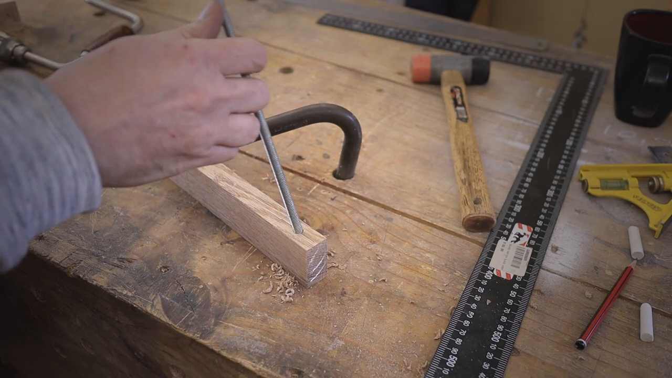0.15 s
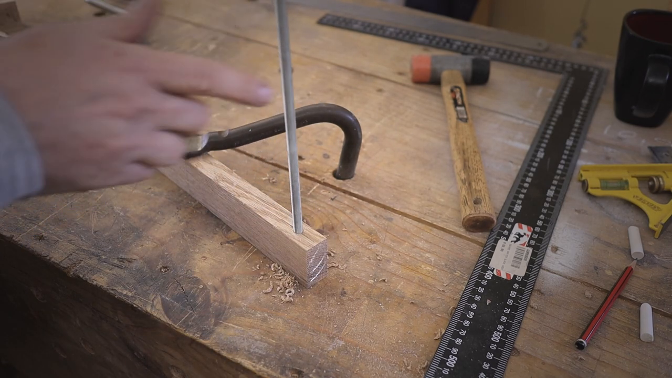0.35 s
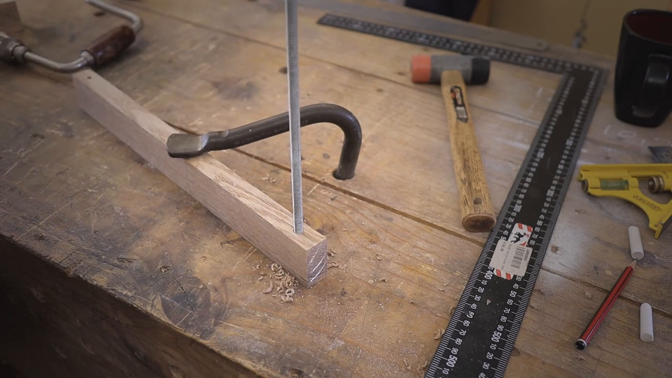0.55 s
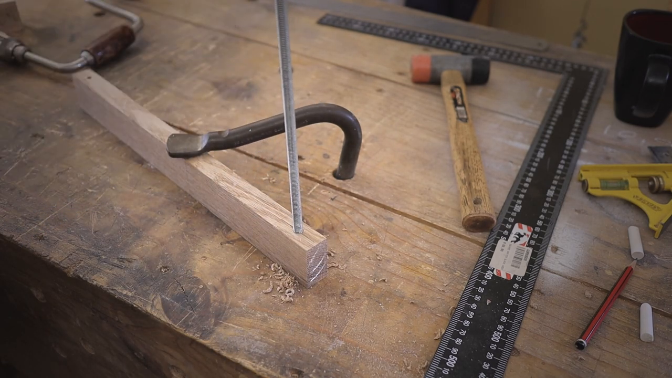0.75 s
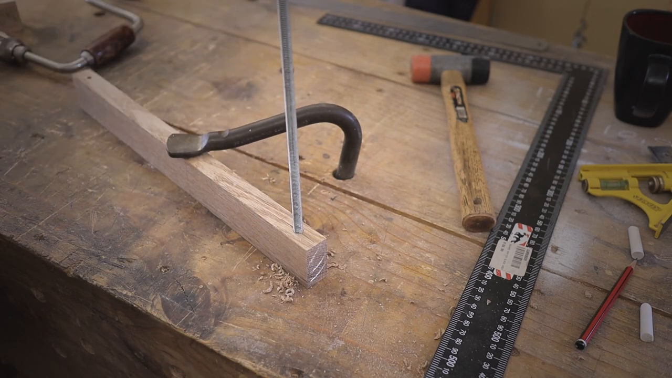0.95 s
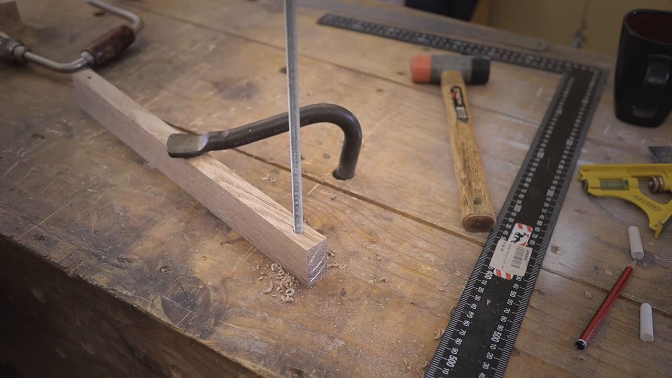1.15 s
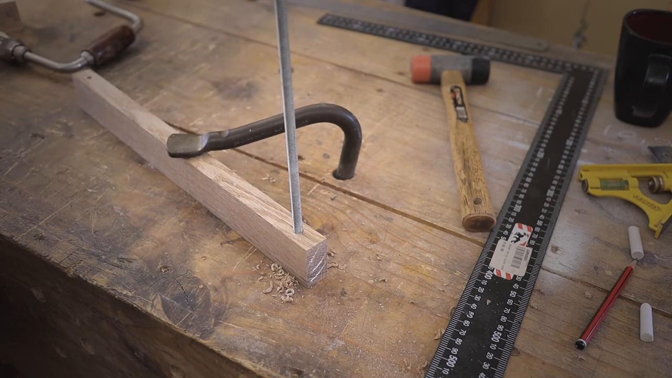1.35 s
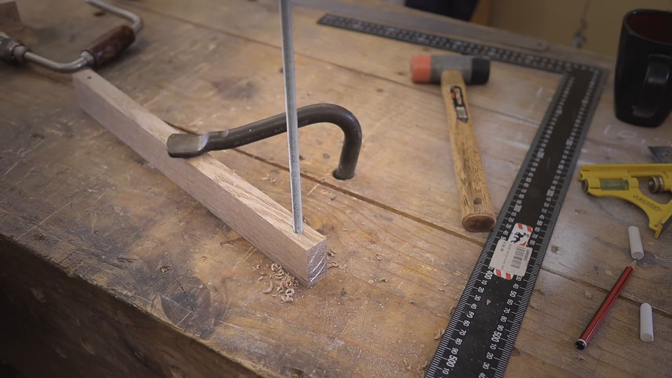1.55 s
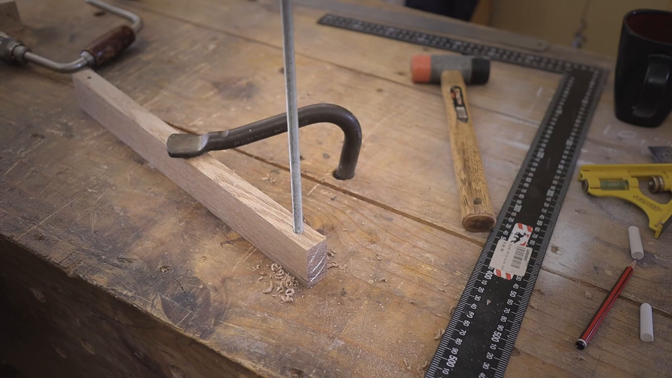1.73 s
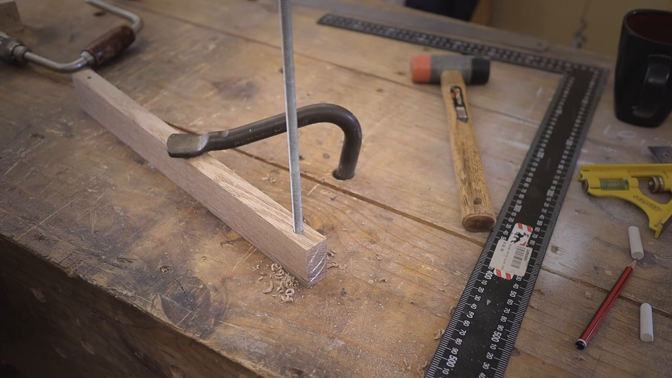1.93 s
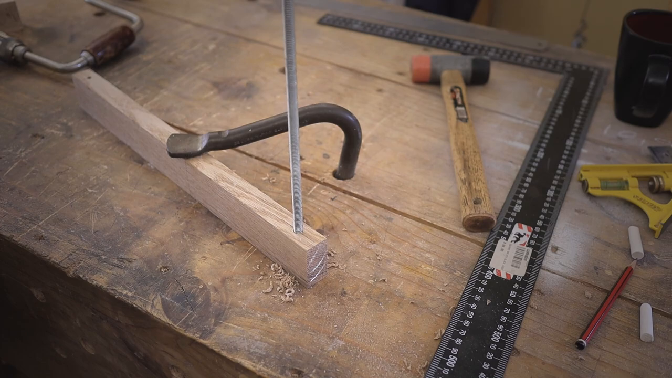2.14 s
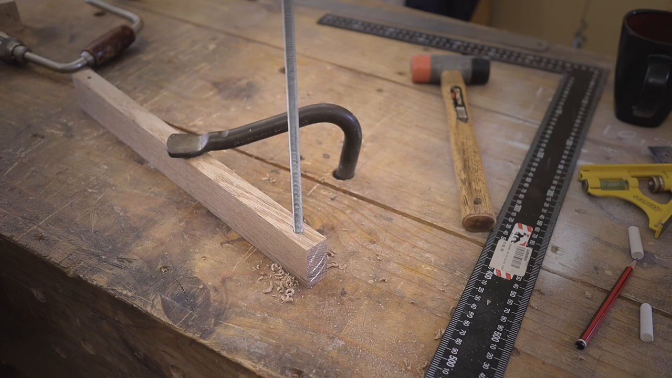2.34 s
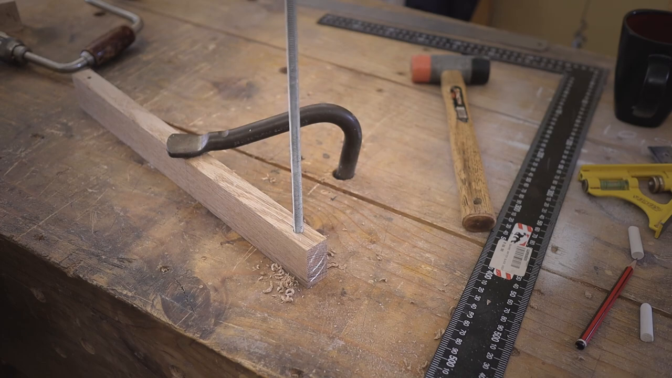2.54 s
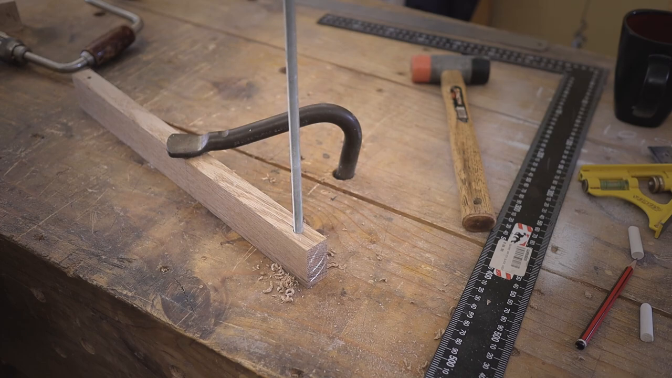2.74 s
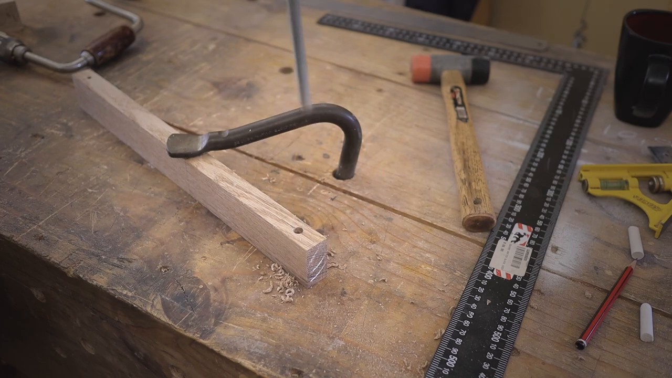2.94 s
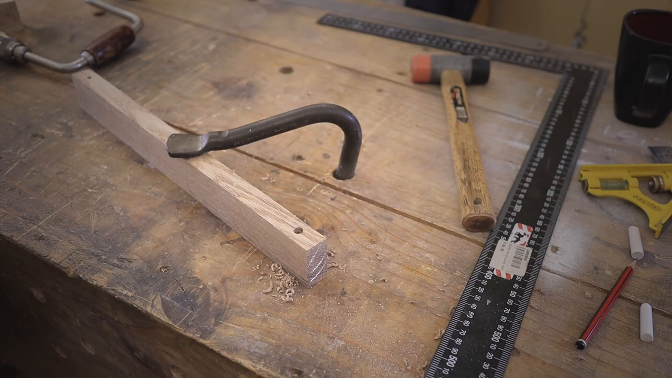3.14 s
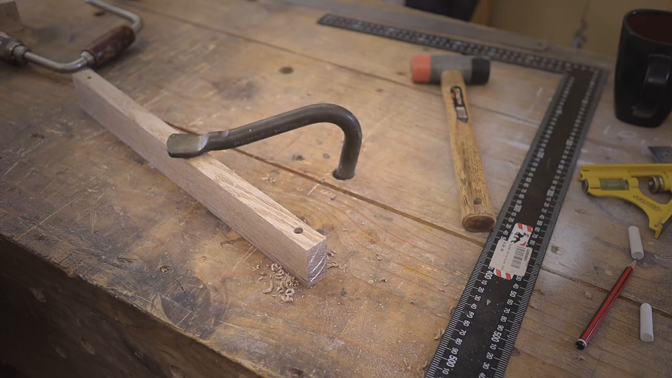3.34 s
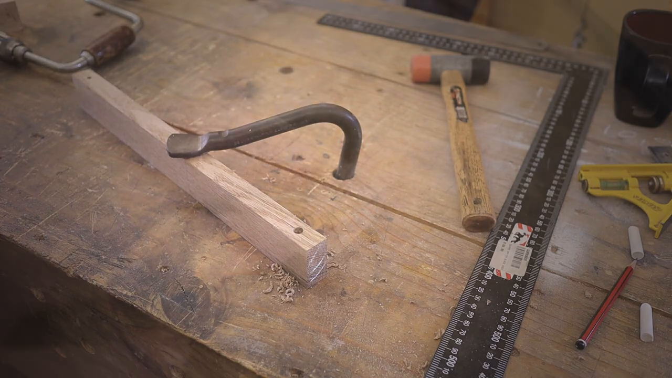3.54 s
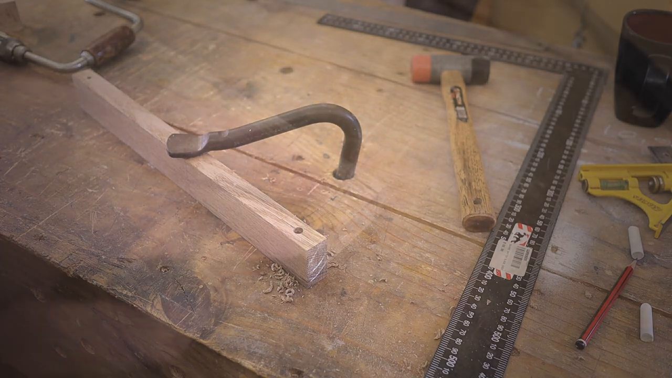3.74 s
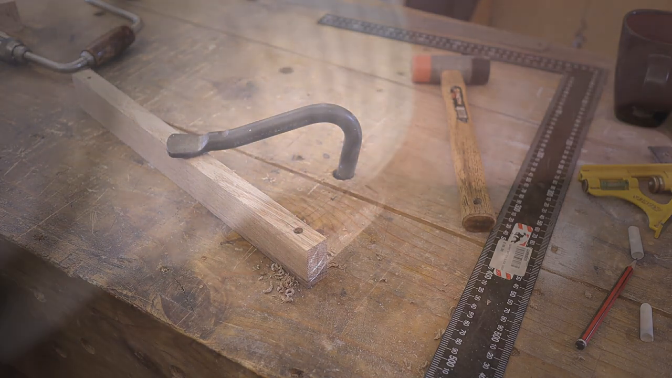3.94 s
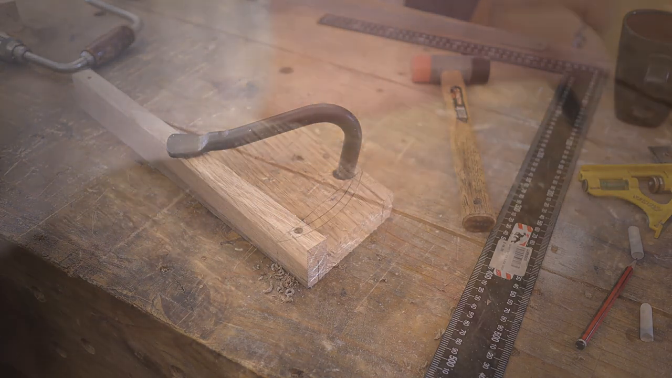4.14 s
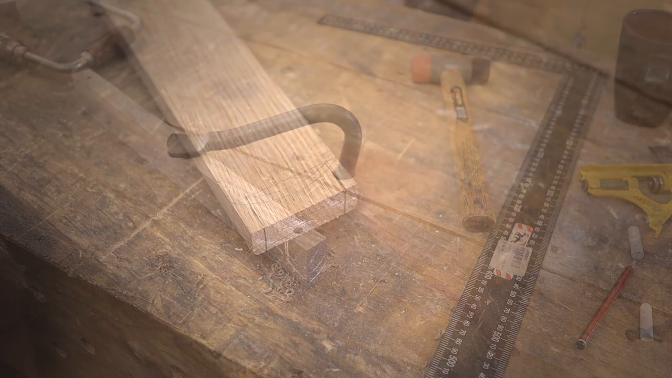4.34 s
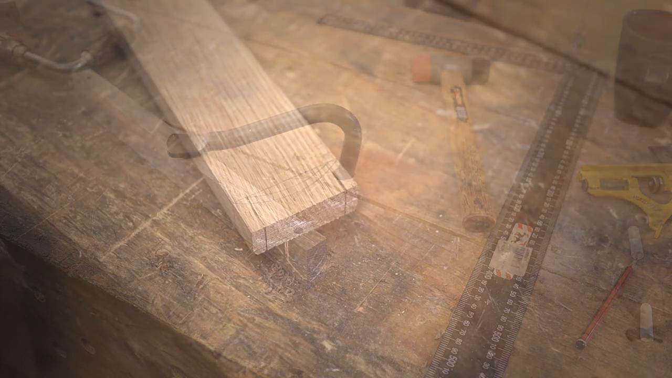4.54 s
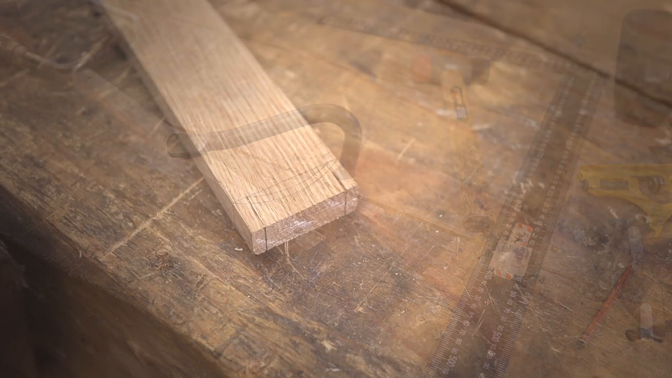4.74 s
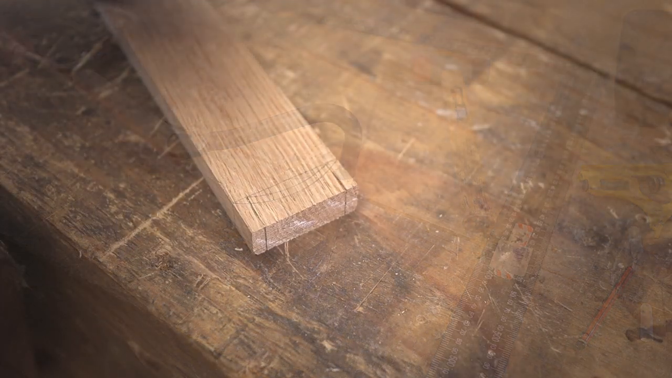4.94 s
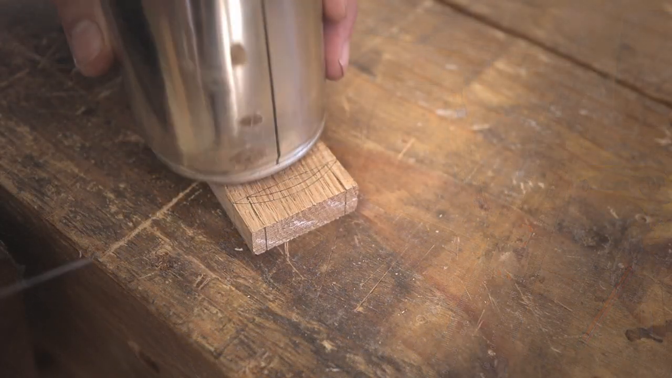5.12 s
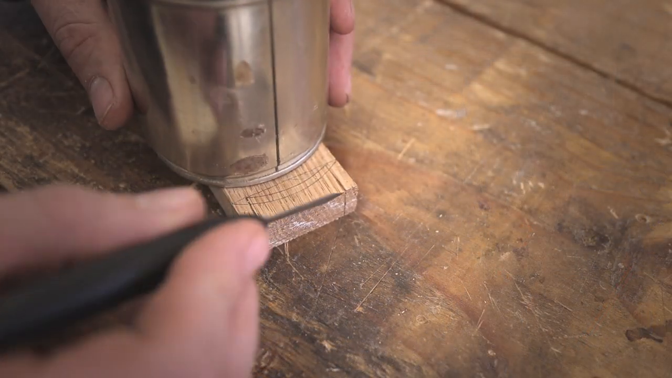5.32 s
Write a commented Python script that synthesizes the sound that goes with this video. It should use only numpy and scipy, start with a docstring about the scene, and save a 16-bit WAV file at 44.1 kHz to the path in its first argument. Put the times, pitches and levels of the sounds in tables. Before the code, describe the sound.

A small, quiet workshop with low, soft air noise, heard close up. A faint wooden tap opens, with a barely audible brush of cloth near 0.3 s. From about 0.39 s a steel rod chatters rapidly in a hole in a wooden batten, about eight contacts in under a tenth of a second. Light knocks at 0.7 s lead to a hard, bright clack at 0.79 s with an immediate hollow thud on the bench and a short room echo. Faint scrapes and ticks follow at 1.05, 1.6 and 2.24 s, with a small click at 2.43 s and a tiny rustle near 2 s. At 2.8 s the rod is pulled out: a scrape and quickening rattle peak around 2.9 s, with small trailing knocks. Soft sleeve rustles run from 3.3 to 4.1 s. At 4.26 s the background abruptly becomes a brighter, wider steady hiss, continuing alone to the end.

```python
"""In a small workshop, a steel rod drops into a hole in a wooden batten, which rocks and thuds on a bench.
The rod shifts and ticks in the hole, then is pulled out with a rattle; a sleeve brushes past.
Blows ring decaying sines for wood and steel, with fading noise for the wood's dense tones and the echo.
Rubbing, ticks and cloth are shaped noise. Quiet air noise gives way to a brighter hiss near the end."""
import sys
import numpy as np
from scipy import signal
from scipy.fft import rfft, irfft
from scipy.io import wavfile

SR = 44100
rng = np.random.default_rng(int(sys.argv[2]) if len(sys.argv) > 2 else 0)


def waveform_to_disk(signal):
    """Save audio, clipped to [-1, 1], as 16-bit WAV at the path in sys.argv[1]."""
    frames = np.transpose(np.atleast_2d(signal))
    scaled = np.clip(frames, -1, 1) * 32767
    samples = np.round(scaled).astype(np.int16)
    wavfile.write(sys.argv[1], SR, samples)


N = 237178  # length of the scene in samples
RING_SIZE = 32768  # length of one short sound in samples
T = np.arange(RING_SIZE) / SR
HZ = np.fft.rfftfreq(RING_SIZE, 1 / SR)

# Quiet workshop air: (frequency [Hz], density [dB per Hz])
AIR_SPECTRUM = [(15, -35), (25, -19), (66, -0.5), (107, -1.5), (156, 0), (297, -5), (331, -4), (582, -7.5),
                (895, -8), (1270, -11), (2060, -15), (2490, -19.5), (3930, -19), (6730, -29),
                (15500, -31.5)]
# Brighter hiss near the end: (frequency [Hz], density [dB per Hz])
HISS_SPECTRUM = [(29, -50), (50, 1), (85, -2), (211, -1), (358, -4), (413, -3.5), (718, -5.5), (870, -6.5),
                 (1700, -10), (15500, -16.5)]
# How alike the hiss is on left and right: (frequency [Hz], likeness [0 to 1])
HISS_LIKENESS = [(1000, 0.93), (2800, 0.79), (5000, 0.72), (9000, 0.64), (12000, .55), (14000, .98)]
AIR_DB, HISS_DB, HISS_START_S = -52.5, -49, 4.259

# Colour of the workshop echo: (frequency [Hz], level [dB])
ROOM_COLOUR = [(100, 12), (700, 0.5), (2000, 0), (4500, 0.5), (8000, -1.5), (15000, 8)]
# Time for the echo to fall by 60 dB: (frequency [Hz], decay time [s])
ROOM_DECAY = [(100, 0.42), (260, 0.38), (700, 0.37), (1840, 0.31), (4850, 0.25), (10000, 0.17)]

# Cloth brushing past: (time [s], level [dB], half length [s], treble edge [Hz])
RUSTLES = [(0.283, -62, 0.13, 9000), (1.974, -56.5, 0.028, 6260), (3.352, -59, 0.1, 5500),
           (3.506, -53, 0.039, 8660), (3.731, -52.5, 0.07, 7660), (3.999, -51, 0.045, 6600),
           (4.101, -54.5, 0.031, 7600)]

# Tones of batten and bench top: (frequency [Hz], level [dB], time to fall by 60 dB [s])
BENCH_MODES = [(71.2, -11.5, 0.69), (140.3, -4, 0.38), (186, 0.5, 0.11), (201, -9, 0.28), (233.6, -2, 0.35),
               (254.1, -5.5, 0.35), (329, -29, 0.28), (331, -10, 0.38), (348.3, -7.5, 0.6),
               (386, 0.5, 0.32), (408, -3.5, 0.51), (447.5, -5, 0.34), (544, -23, 0.41), (562, -25.5, 0.12),
               (644, -12.5, 0.41), (710, 3.5, 0.29), (755, -0.5, 0.25), (797, -6, 0.29), (830, -11, 0.33),
               (869, -0.5, 0.3), (915, -4, 0.3), (983, -32, 0.37), (1060, -21, 0.45), (1184, -8.5, 0.35),
               (1510, -8, 0.28), (1600, -13, 0.18), (1900, -10, 0.14), (2045, -10.5, 0.36),
               (2150, -8, 0.11), (2363, -5.5, 0.2)]
# Bending tones of the rod: (frequency [Hz], level [dB])
ROD_MODES = [(4285, -6), (5001, 0), (5599, 12), (6304, 2.5), (7047, -6), (7800, -7), (8590, -6), (9450, 0),
             (10300, -1.5), (11200, -1)]
# Dense, quickly damped vibration of the wood: (frequency [Hz], density [dB per Hz])
GRAIN_SPECTRUM = [(50, -77), (125, -8), (300, -5), (480, 0), (750, -1), (1150, -2.5), (1450, -9),
                  (2100, -6), (2700, -12.5), (3500, -17), (4200, -25), (5000, -26), (7000, -38),
                  (10000, -63), (16000, -57)]
GRAIN_T60, ROD_T60 = 0.057, 0.08  # s to fall by 60 dB; scraping lengthens the grain's
BENCH_DB, ROD_DB, GRAIN_DB, ROOM_DB, SNAP_DB = 0.5, -25, 3, -4.5, 22  # parts of a blow
ROD_WIDTH_HZ, ROD_LIFT_DB = 61, 6.5  # lift of the wood noise around each rod tone
# A brighter contact rings the rod more: level at brightness 0 dB, and dB of steel per dB of brightness
STEEL_DB, STEEL_PER_BRIGHT = -4.5, 0.43

# Rod dragging along the hole, building up to a knock:
# (peak time [s], level [dB], build-up time [s], tilt [dB per octave])
SLIDES = [(0.39, -40.5, 0.031, -5.5), (0.684, -50, 0.029, 12), (0.786, -20.5, 0.0071, 0),
          (1.605, -44.5, 0.018, 5.5), (2.236, -48, 0.01, 15), (2.816, -36.5, 0.017, -6.5),
          (2.872, -16.5, 0.018, 1.5)]
# Light, dry clicks of the rod in the hole: (time [s], level [dB], centre [Hz], width [octaves])
TICKS = [(0.682, -49, 6500, 0.91), (0.703, -36.5, 5250, 0.54), (0.787, -44.5, 8000, 0.65),
         (1.622, -50, 11300, 0.59), (1.929, -57, 7000, .8), (2.237, -49, 2300, 0.69),
         (2.433, -36.5, 2040, 0.63), (2.432, -41, 4540, 0.88), (2.843, -44, 8500, 0.67)]
# Single blows of rod on wood and wood on bench; the place of a blow favours one region of tones:
# (time [s], force [dB], bass weight [dB], brightness [dB], favoured tone [Hz], scraping time [s])
KNOCKS = [ (0.004, -44.5, 5.5, -10.5, 170, 0.0016), (0.267, -59, 16.5, 10, 150, 0.011),
          (0.682, -40, 9.5, 2.5, 166, 0.0023), (0.700, -33.5, 1, -1.5, 440, 0.0018),
          (0.713, -39.5, 12, -1, 160, 0.0029), (0.786, -18.5, -11, -1.5, 3370, 0.0023),
          (0.7895, -22, 15, -4, 196, 0.00095), (0.803, -22.5, 4.5, -11, 380, 0.0022),
          (1.055, -54, -16, -1, 1880, 0.032), (1.601, -49, 6, 6, 2370, 0.049),
          (1.668, -54.5, -1, -2, 1990, .005), (2.074, -62.5, 0, 8, 2200, 0.0021),
          (2.2362, -41, -1, 4.5, 2100, 0.0026), (2.250, -49.5, 8, 11, 760, 0.0099),
          (2.433, -67, -12, 18, 2100, 0.0012), (2.929, -35.5, -1, 1, 300, .003),
          (2.952, -40, -12, 4.5, 1220, .004), (3.212, -53.5, -11.5, -2, 2500, .012),
          (3.695, -50.5, -14, 1, 920, .012)]

# Rod chattering between the walls of the hole, going in and coming out:
# (start [s], first gap [s], each gap as a share of the last [ratio], climax [share of the contacts],
#  force at the climax [dB], rise in force towards the climax [dB], tone away from the climax [Hz],
#  tone at the climax [Hz], bass weight away from the climax [dB], lowest tone [Hz])
RATTLES = [(0.389, .0155, 0.92, 0.54, -24, -1.5, 737, 2200, 3, 73),
           (2.811, .0205, .77, 0.718, -19, 12, 480, 1380, 1.5, 141)]
RATTLE_CONTACTS, RATTLE_SCRAPE_S = 8, 0.0032
GAP_JITTER_S = 0.0006  # typical random change of a gap: no two rebounds are quite alike
CLIMAX_WIDTH = 0.35  # share of the contacts
RATTLE_BRIGHT_DB, CLIMAX_BRIGHT_DB = -4.5, 4.5  # brightness away from the climax, and its rise there
CLIMAX_WEIGHT_DB = -10.5  # change in bass weight at the climax
# Dry click of each contact, its level being against the contact's force
RATTLE_TICK_DB, RATTLE_TICK_HZ, RATTLE_TICK_OCTAVES = -31.5, 6500, 0.76

RECORDER_EDGE_HZ = 15800


def gain_of(db):
    """Turns decibels into gain."""
    return 10 ** (np.asarray(db) / 20)


def evened(x):
    """Scales a sound to an rms of 1."""
    return x / np.sqrt(np.mean(x ** 2) + 1e-20)


def read(points, hz):
    """Reads between the points of a table on a log-frequency axis."""
    table_hz, value = np.transpose(points)
    return np.interp(np.log(hz + 1), np.log(table_hz + 1), value)


def add(mix, s, sound):
    """Mixes a sound in at time s, in seconds."""
    part = mix[max(round(s * SR), 0):][:len(sound)]
    part += sound[:len(part)]


def noise(gain, size):
    """Makes noise of rms 1 whose spectrum follows gain(Hz)."""
    spectrum = rfft(rng.standard_normal(size))
    return evened(irfft(spectrum * gain(np.fft.rfftfreq(size, 1 / SR)), size))


def colour(x, db):
    """Applies the given dB at each frequency of HZ, with no sound ahead of its cause."""
    log_gain = np.log(gain_of(np.r_[db, db[-2:0:-1]]))
    # the Hilbert transform supplies the phase of a causal filter
    response = np.exp(np.conj(signal.hilbert(log_gain)))[:len(HZ)]
    return irfft(rfft(x, RING_SIZE) * response)


def background():
    """Quiet workshop air gives way abruptly to a brighter hiss that is wide in the treble."""
    air = gain_of(AIR_DB) * noise(lambda hz: gain_of(read(AIR_SPECTRUM, hz)), N)
    hz = np.fft.rfftfreq(N, 1 / SR)
    likeness = np.clip(read(HISS_LIKENESS, hz), 0, 1)
    mid, side = rfft(rng.standard_normal((2, N))) * gain_of(read(HISS_SPECTRUM, hz))
    # the less alike the two channels are, the stronger the side signal
    side = irfft(side * np.sqrt((1 - likeness) / (1 + likeness)), N)
    mid = irfft(mid, N)
    hiss = gain_of(HISS_DB) * np.array([mid + side, mid - side]) / mid.std()
    return np.where(np.arange(N) / SR < HISS_START_S, air, hiss)


def room_tail(x):
    """Turns steady noise into an echo: it builds up in a few ms and each band dies at its own speed."""
    hz, t, bands = signal.stft(x, SR, nperseg=256)
    start_db = read(ROOM_COLOUR, hz)[:, None]
    fall_db = 60 * t / read(ROOM_DECAY, hz)[:, None]
    tail = signal.istft(bands * gain_of(start_db - fall_db), SR, nperseg=256)[1][:RING_SIZE]
    return tail * (1 - np.exp(-T / 0.0049))


def rustles(low_hz=750, slope=0.35, grit_db=2.0):
    """Sliding cloth makes a swell of fibre noise that flutters slightly."""
    out = np.zeros(N)
    t = T - T[-1] / 2  # time from the middle of the swell
    for s, db, half_s, edge_hz in RUSTLES:
        def fibre_gain(hz):
            ratio = hz / low_hz
            return ratio ** 2 / (1 + ratio ** (2 + slope)) / (1 + (hz / edge_hz) ** 5)

        fibres = noise(fibre_gain, RING_SIZE)
        flutter = noise(lambda hz: 1 / (1 + (hz / 90) ** 2), RING_SIZE)
        swell = np.exp(-(t / half_s) ** 2 / 2)
        swish = gain_of(db + grit_db * flutter) * fibres * swell
        start_s = s + t[0]
        # leave out any part before time zero
        add(out, start_s, swish[max(-round(start_s * SR), 0):])
    return out


def wood(hz):
    """Spectrum of a contact: the wood's dense tones, lifted around each tone of the rod."""
    near_rod = sum(1 / (1 + ((hz - rod_hz) / ROD_WIDTH_HZ) ** 2) for rod_hz, _ in ROD_MODES)
    return gain_of(read(GRAIN_SPECTRUM, hz) + ROD_LIFT_DB * near_rod)


def slides(release_s=0.0049, grit_db=2.0):
    """Stick-slip friction in the hole grows as the rod gathers speed, and stops soon after it lands."""
    out = np.zeros(N)
    t = T - T[-1] / 2  # time from the peak
    for s, db, build_s, tilt_db in SLIDES:
        rub = noise(lambda hz: wood(hz) * gain_of(tilt_db * np.log2(hz + 1)), RING_SIZE)
        slips = noise(lambda hz: 1 / (1 + (hz / 200) ** 2), RING_SIZE)
        swell = np.exp(np.minimum(t / build_s, -t / release_s))
        add(out, s + t[0], gain_of(db + grit_db * slips) * rub * swell)
    return out


def ticks(clicks, t60=0.021, echo_db=-17):
    """Tiny hard contacts each make a short band of noise with a faint echo."""
    out = np.zeros(N)
    for s, db, centre_hz, octaves in clicks:
        def band(hz):
            return 1 / (1 + (np.log2((hz + 1) / centre_hz) / octaves) ** 4)

        click = gain_of(-60 * T / t60) * noise(band, RING_SIZE)
        echo = gain_of(echo_db) * room_tail(noise(band, RING_SIZE))
        add(out, s, gain_of(db) * (click + echo))
    return out


def ring(modes):
    """Sums dying sines with unit starting power; neighbouring modes swing in opposite senses."""
    sound = np.zeros(RING_SIZE)
    for k, (hz, db, t60) in enumerate(modes):
        sound += (-1) ** k * gain_of(db - 60 * T / t60) * np.sin(2 * np.pi * hz * T)
    power = sum(gain_of(db) ** 2 for _, db, _ in modes) / 2
    return sound / np.sqrt(power)


def contact(scrape_s, share):
    """One firm push is joined by the tiny slips of a surface scraping to rest."""
    slips = rng.standard_normal(RING_SIZE) * np.exp(-T / scrape_s)
    force = share * slips / np.linalg.norm(slips)
    force[0] += 1
    return force / np.linalg.norm(force)


def knocks(blows, lowest_hz, bass_hz=380, treble_hz=1400, favour_db=7, favour_octaves=0.32):
    """Each blow snaps, then rings the bench, the wood's dense tones, the rod and the room."""
    bench = gain_of(BENCH_DB) * ring(BENCH_MODES)
    rod = gain_of(ROD_DB) * ring([(hz, db, ROD_T60) for hz, db in ROD_MODES])
    snap = colour([1], read(GRAIN_SPECTRUM, HZ))  # first swing of the wood under the blow
    snap *= gain_of(SNAP_DB) / np.linalg.norm(snap)
    bass = 1 / (1 + (HZ / bass_hz) ** 4)
    treble = 1 - 1 / (1 + (HZ / treble_hz) ** 3)
    out = np.zeros(N)
    for s, force_db, weight_db, bright_db, tone_hz, scrape_s in blows:
        grain = gain_of(GRAIN_DB - 60 * T / (GRAIN_T60 + 4 * scrape_s)) * noise(wood, RING_SIZE)
        # a scraping contact starts softly and has little snap
        grain *= 1 - np.exp(-3 * T / scrape_s)
        softened_snap = snap * np.exp(-scrape_s / 0.0029)
        echo = gain_of(ROOM_DB) * room_tail(noise(wood, RING_SIZE))
        force = contact(scrape_s, share=0.71)
        bench_ring = signal.fftconvolve(force, bench)[:RING_SIZE]
        favoured = 1 / (1 + (np.log2((HZ + 1) / tone_hz) / favour_octaves) ** 2)
        tone_db = weight_db * bass + bright_db * treble + favour_db * favoured
        body = colour(softened_snap + bench_ring + grain + echo, tone_db)
        steel_gain = gain_of(STEEL_DB + STEEL_PER_BRIGHT * bright_db)
        steel = steel_gain * signal.fftconvolve(force, rod)[:RING_SIZE]
        add(out, s, gain_of(force_db) * (body + steel))
    # the blows carry little sound below their lowest tone
    high_pass = signal.butter(3, lowest_hz, "high", fs=SR, output="sos")
    return signal.sosfilt(high_pass, out)


def rattle(start_s, gap_s, shrink, climax, top_db, swell_db, first_hz, top_hz, weight_db, lowest_hz):
    """Rebounds come at shrinking gaps, growing thinner, brighter and higher towards a climax."""
    k = np.arange(RATTLE_CONTACTS)
    gaps = gap_s * shrink ** k + GAP_JITTER_S * rng.standard_normal(len(k))
    times = start_s + np.cumsum(gaps) - gaps
    vigour = np.exp(-((k / k[-1] - climax) / CLIMAX_WIDTH) ** 2)
    blows, clicks = [], []
    for s, v in zip(times, vigour):
        force_db = top_db - swell_db * (1 - v)
        bass_db = weight_db + CLIMAX_WEIGHT_DB * v
        bright_db = RATTLE_BRIGHT_DB + CLIMAX_BRIGHT_DB * v
        tone_hz = first_hz * (top_hz / first_hz) ** v
        blows.append((s, force_db, bass_db, bright_db, tone_hz, RATTLE_SCRAPE_S))
        clicks.append((s, force_db + RATTLE_TICK_DB, RATTLE_TICK_HZ, RATTLE_TICK_OCTAVES))
    return knocks(blows, lowest_hz) + ticks(clicks)


def scene():
    """Mixes the handling, all heard in the centre, with the background."""
    rattles = sum(rattle(*row) for row in RATTLES)
    rod_and_wood = slides() + ticks(TICKS) + knocks(KNOCKS, lowest_hz=56) + rattles
    return background() + rustles() + rod_and_wood


def record(dry):
    """The recorder's band limit removes the highest treble."""
    low_pass = signal.firwin(511, RECORDER_EDGE_HZ, window=("kaiser", 9), fs=SR)
    return signal.oaconvolve(dry, low_pass[None], "same")


dry = scene()
out = record(dry)
waveform_to_disk(out)
```